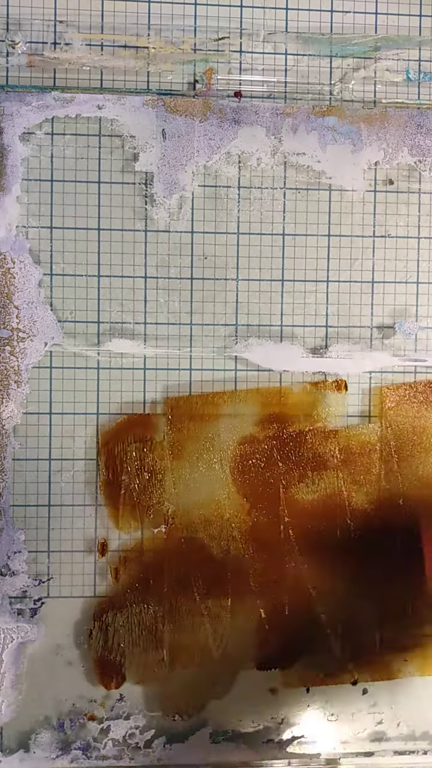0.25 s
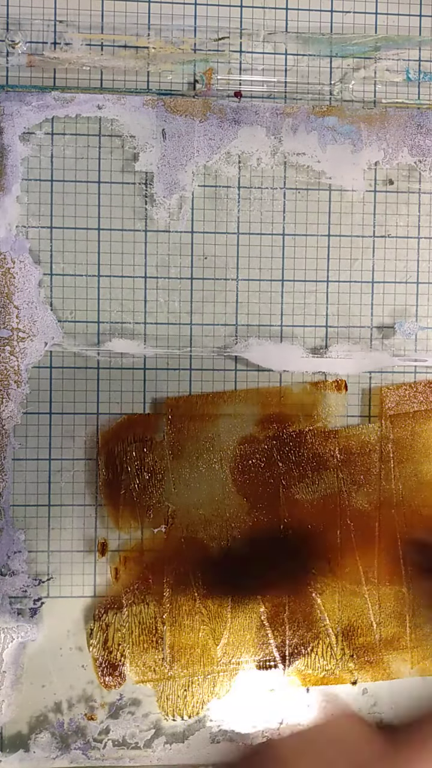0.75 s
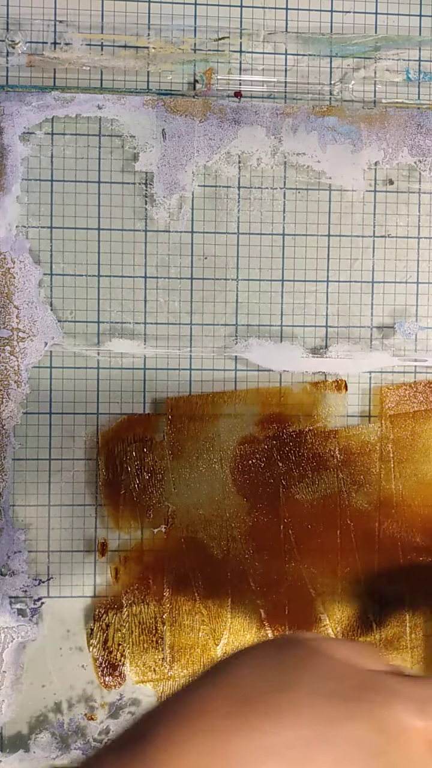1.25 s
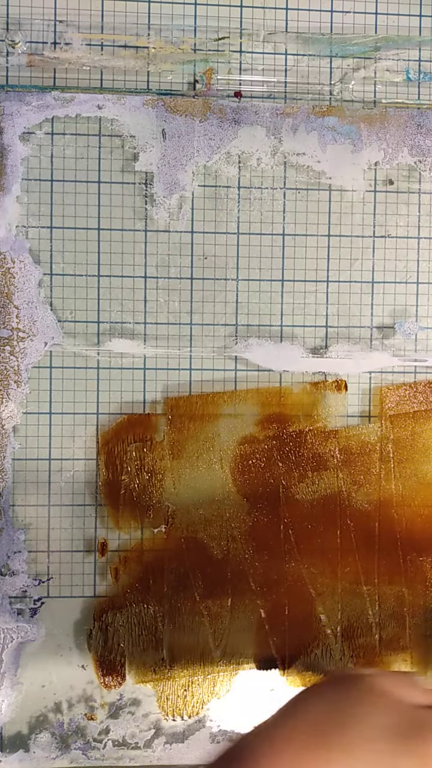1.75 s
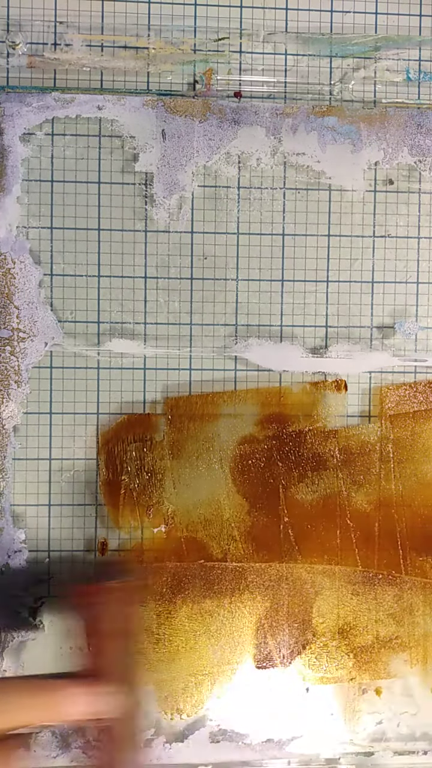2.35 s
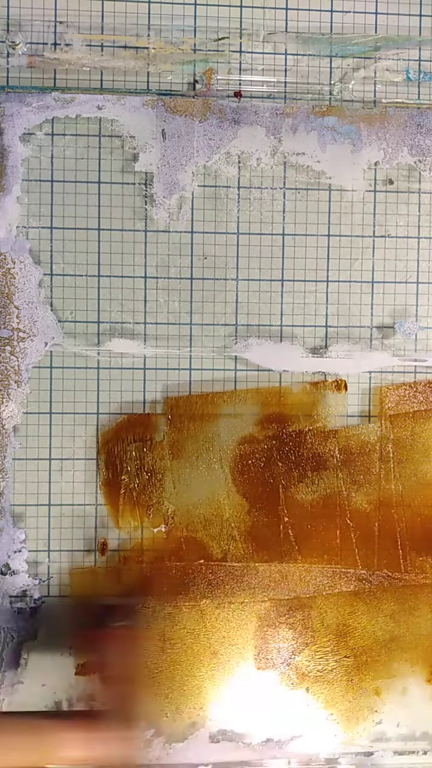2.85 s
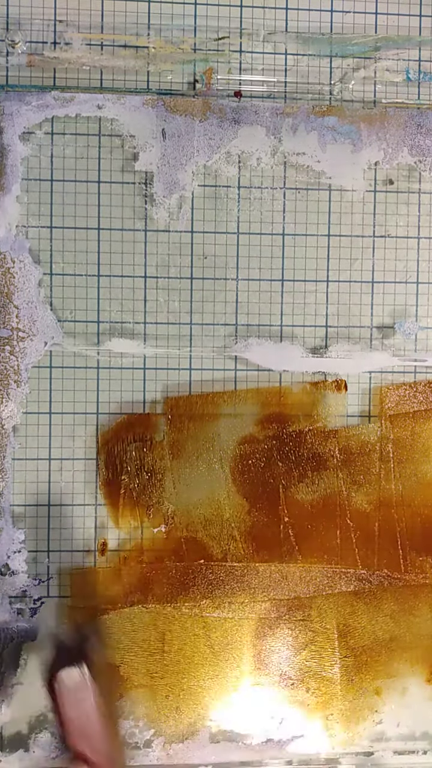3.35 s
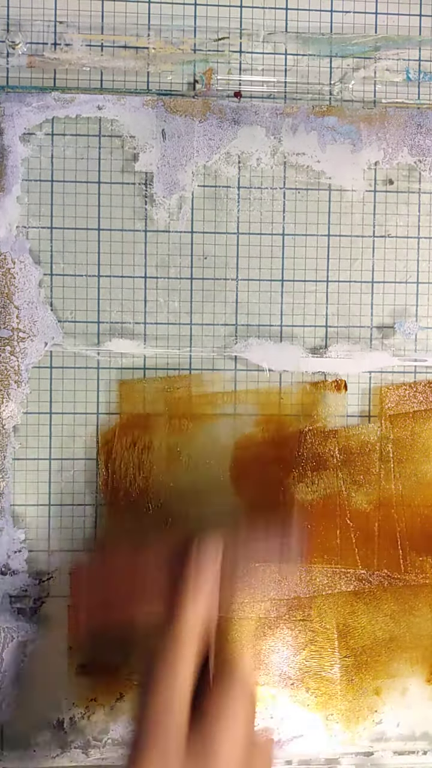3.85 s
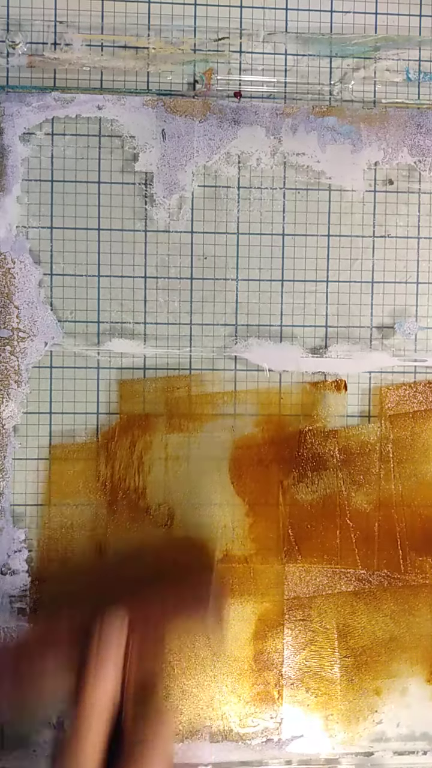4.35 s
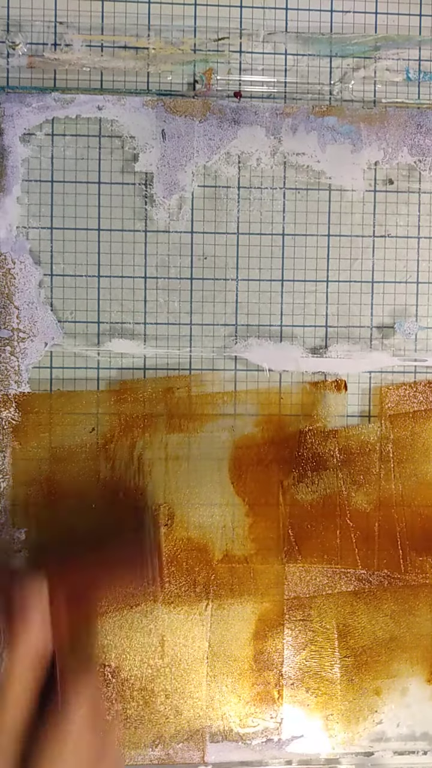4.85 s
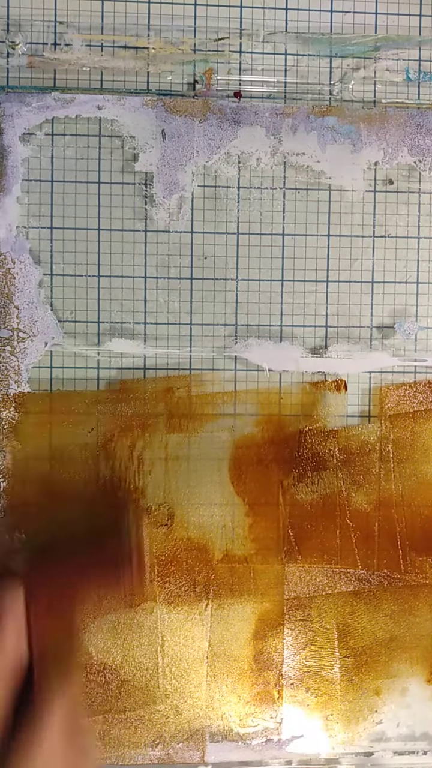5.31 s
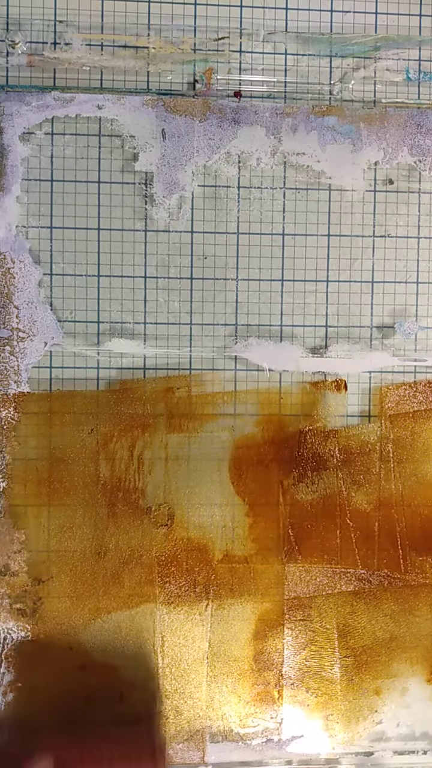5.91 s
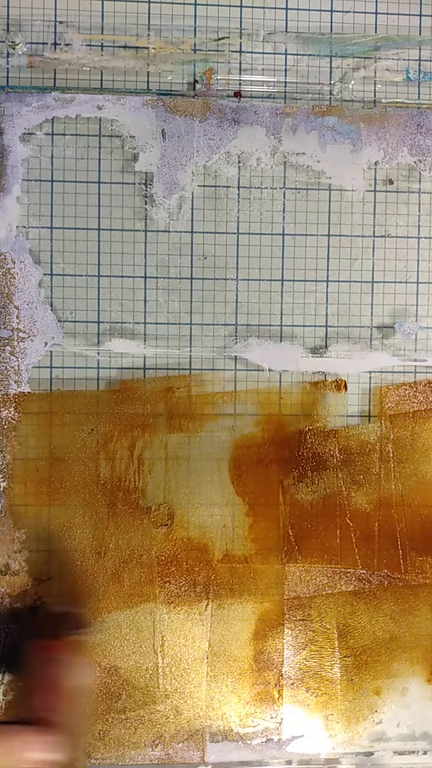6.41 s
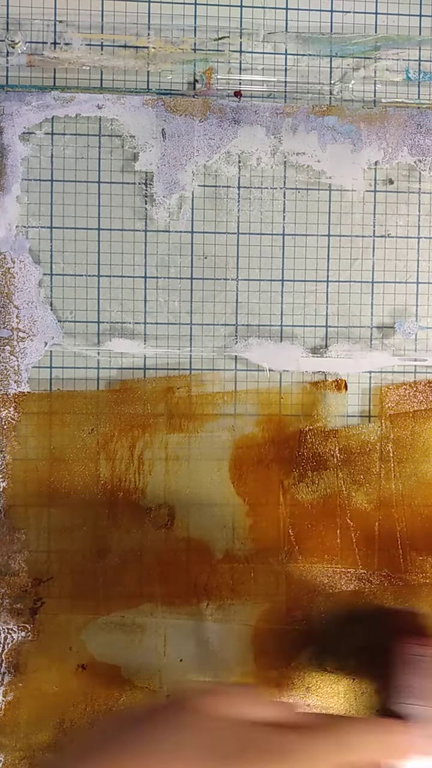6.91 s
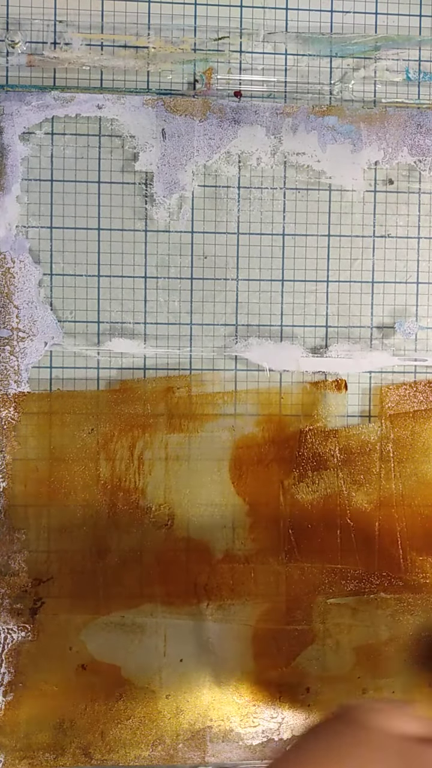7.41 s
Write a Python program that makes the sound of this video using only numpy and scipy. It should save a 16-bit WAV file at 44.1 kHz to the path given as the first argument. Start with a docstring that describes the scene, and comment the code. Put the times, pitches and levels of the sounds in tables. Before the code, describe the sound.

A rubber roller clacks its loose frame and rolls tacky paint across a plate, crackling in sizzling bursts with squelchy skids and low table thumps.

```python
"""A rubber brayer clacks: its loose axle cracks twice in a resonant plastic frame as it lands, lifts and turns.
It rolls tacky paint over a plate close to the microphone; breaking threads sizzle as trains of tiny random snaps.
The rubber skids in coarse and fine slips, rubs with a hollow sinking note and pings its frame when lifted.
Blows ring the modes of the craft table, and each push shakes it into a low rumble.
The roller moves between left and right in a small room with a diffuse tail and a quiet background."""
import sys
import numpy as np
from scipy import signal
from scipy.fft import rfft, irfft, next_fast_len
from scipy.io import wavfile
from scipy.ndimage import uniform_filter1d, map_coordinates

SR = 44100
rng = np.random.default_rng(int(sys.argv[2]) if len(sys.argv) > 2 else 0)


def waveform_to_disk(signal):
    """Save audio, clipped to [-1, 1], as 16-bit WAV at the path in sys.argv[1]."""
    frames = np.transpose(np.atleast_2d(signal))
    scaled = np.clip(frames, -1, 1) * 32767
    samples = np.round(scaled).astype(np.int16)
    wavfile.write(sys.argv[1], SR, samples)


N = 338247  # length in samples


def amp(db):
    """Level law: decibels to an amplitude ratio."""
    return 10 ** (np.asarray(db) / 20)


def unit(x):
    """Normalization: scales to an rms of 1."""
    return x / np.sqrt(np.mean(x ** 2) + 1e-20)


def peaked(x, size=176):
    """Short-time rms: scales the loudest few milliseconds of each channel to unit level."""
    return x / np.sqrt(uniform_filter1d(x ** 2, size).max(1, keepdims=True))


def read(points, hz):
    """Interpolation on a logarithmic frequency axis."""
    f, value = np.transpose(points)
    return np.interp(np.log(hz + 1), np.log(f + 1), value)


def smooth(x, first, second, axis=-1):
    """Smoothing by two moving averages in a row along one axis."""
    return uniform_filter1d(uniform_filter1d(x, first, axis=axis), second, axis=axis)


def add(mix, s, sound):
    """Superposition: adds a sound into the mix from time s."""
    start = max(round(s * SR), 0)
    part = mix[:, start:][:, :sound.shape[1]]
    part += sound[:, :part.shape[1]]


# likeness of the two ports: f/Hz, left-right correlation
PORT_LIKENESS = [(200, 0.66), (400, 0.89), (750, 0.63), (3000, 0.16), (9000, 0.087)]


def paired(z, hz):
    """Spatial coherence: two microphone ports hear similar bass but different treble."""
    same = np.clip(read(PORT_LIKENESS, hz), -1, 1)
    return np.array([z[0], same * z[0] + np.sqrt(1 - same ** 2) * z[1]])


def coloured(x, spectrum):
    """Linear filtering: gives a stereo excitation a spectrum, at unit level."""
    size = next_fast_len(N)
    hz = np.fft.rfftfreq(size, 1 / SR)
    filtered = paired(rfft(x, size), hz) * amp(read(spectrum, hz))
    return unit(irfft(filtered, size)[:, :N])


def causal(gain):
    """Minimum phase: the response with this gain that rings only after the blow."""
    log_gain = np.log(np.maximum(gain, 1e-5))
    both_sides = np.r_[log_gain, log_gain[-2:0:-1]]
    return np.exp(np.conj(signal.hilbert(both_sides)))[:len(gain)]


def snaps(per_s, spread_db):
    """Shot noise: tiny snaps at random times, of very unequal size, each a few samples long."""
    happens = rng.random(N) < per_s / SR
    sizes = amp(spread_db * np.minimum(rng.exponential(1, N), 5)) * happens
    power = signal.lfilter([1], [1, -np.exp(-1 / 14)], sizes ** 2)  # decays by 1/e in 14 samples
    return unit(np.sqrt(power) * rng.standard_normal((2, N)))


def patches(depth_db, size=400):
    """Amplitude modulation: a slow random gain makes the level uneven; size is in samples."""
    return amp(depth_db * unit(smooth(rng.standard_normal(N), size, size)))


def lumpy(x, depth_db, size, order=1024):
    """Time-frequency modulation: different bands swell from moment to moment, at unit level."""
    z = signal.stft(x, nperseg=order)[2]
    across_bands = uniform_filter1d(rng.standard_normal(z.shape[1:]), size, axis=0)
    lumps = unit(uniform_filter1d(across_bands, 4, axis=1))
    return unit(signal.istft(z * amp(depth_db * lumps), nperseg=order)[1][:, :N])


BELL = 1.92  # shape of a movement: 1 is pointed, 2 is rounded


def bell(t, peak_s, rise_s, fall_s):
    """Kinematics: a movement gathers speed, peaks at 1 and slows down; rise and fall are to 1/e."""
    distance = np.maximum((peak_s - t) / rise_s, (t - peak_s) / fall_s)
    return np.exp(-np.minimum(distance, 20) ** BELL)


def clicks(rows, colour, crack_s, scatter_db, tilt_db=0, scatter_s=0.013, size=2048):
    """Impulse response: single clicks, tilted per octave, each with a short scatter off the table top."""
    t, hz, out = np.arange(size) / SR, np.fft.rfftfreq(size, 1 / SR), np.zeros((2, N))
    shape = np.hypot(np.exp(-t / crack_s), amp(scatter_db) * np.exp(-t / scatter_s))
    body = causal(amp(read(colour, hz) + tilt_db * np.log2(hz + 1)))
    for s, db in rows:
        noise = rng.choice([-1., 1.], (2, size)) * shape
        click = irfft(paired(rfft(noise), hz) * body)
        add(out, s, peaked(click) * amp(db))
    return out


# background of the room: f/Hz, relative level/dB per Hz
AIR_SPECTRUM = [(20, -23.5), (120, 3.5), (240, -4.5), (450, -2), (1100, -6), (3000, -5), (4700, -21.5),
                (9800, -21.5), (16000, -28.5)]
AIR_DB = -87.5


def background():
    """Stationary noise: a steady random signal shaped by the room's background spectrum."""
    return amp(AIR_DB) * coloured(rng.standard_normal((2, N)), AIR_SPECTRUM)


# reverberation of the room: f/Hz, t60/s
ROOM_DECAY = [(150, 0.47), (1000, 0.37), (3000, 0.2), (9000, 0.18), (16000, 0.16)]


def room(x, wet_db=-13, build_s=0.0027):
    """Diffuse reverberation: a noise tail builds up quickly and dies band by band."""
    hz, t, z = signal.stft(rng.standard_normal((2, SR * 2 // 3)), SR, nperseg=256)
    decay = amp(-60 * t / read(ROOM_DECAY, hz)[:, None])
    z = paired(z, hz[:, None]) * decay * (1 - np.exp(-t / build_s))
    tail = signal.istft(z, SR, nperseg=256)[1]
    tail = tail / np.linalg.norm(tail[0])
    return amp(wet_db) * signal.fftconvolve(x, tail, axes=1)[:, :N]


# pushes of the roller: t/s of top speed, run-up/s, slow-down/s,
# relative level/dB of paint sizzle, relative level/dB of table rumble
PUSHES = [(.057, 0.3, 0.11, -57.5, -68.5), (.201, 0.029, 0.24, -55.5, -73.5), (0.402, 0.02, 0.06, -50, -93),
          (.639, 0.08, 0.073, -53, -72), (0.913, 0.068, 0.24, -58.5, -70),
          (1.325, 0.048, 0.079, -59, -67.5), (1.54, 0.026, 0.11, -53.5, -80),
          (1.989, 0.18, 0.051, -61.5, -69.5), (2.28, 0.015, 0.017, -50, -92),
          (2.47, 0.18, 0.078, -52, -74.5), (2.729, 0.071, 0.062, -49.5, -80.5),
          (2.991, 0.087, 0.06, -51, -68.5), (3.217, 0.069, 0.025, -36, -63.5),
          (3.335, 0.051, 0.14, -45, -73), (3.742, 0.027, 0.034, -44, -62), (3.961, 0.18, 0.2, -51.5, -77),
          (4.559, 0.14, 0.1, -49.5, -64.5), (5.014, 0.083, 0.13, -52, -67), (5.555, 0.2, 0.11, -52, -66.5),
          (6.005, 0.1, 0.13, -50.5, -68), (6.524, 0.13, 0.022, -51.5, -63), (6.681, 0.11, 0.15, -50.5, -68),
          (7.082, 0.3, 0.049, -62, -74.5), (7.311, 0.13, 0.16, -61.5, -72.5)]
RUMBLE_POWER = 0.13  # the rumble grows as this power of the speed


def strokes(size=4000):
    """Speed-driven excitation: each push sets the gains of sizzle and rumble, which add as powers."""
    t, power = np.linspace(0, N / SR, size), np.zeros((2, size))
    for peak_s, rise_s, fall_s, sizzle_db, rumble_db in PUSHES:
        speed = bell(t, peak_s, rise_s, fall_s)
        gains = np.array([amp(sizzle_db) * speed, amp(rumble_db) * speed ** RUMBLE_POWER])
        power += gains ** 2
    return [np.interp(np.arange(N) / SR, t, np.sqrt(p)) for p in power]


# shaken table: f/Hz, relative level/dB per Hz
RUMBLE_SPECTRUM = [(18, -27), (45, -15), (62, 5.5), (95, -7.5), (118, 8.5), (142, -9.5), (170, 2),
                   (230, -25.5), (350, -10), (700, -47.5)]


def rumble(rumbling, gain_db=-1):
    """Forced vibration: the uneven roller shakes the table as low random noise."""
    shaking = coloured(rng.standard_normal((2, N)), RUMBLE_SPECTRUM)
    return lumpy(shaking, depth_db=5.5, size=2) * amp(gain_db) * rumbling


# the roller meets the plate: t/s, relative level/dB, centre of the blow f/Hz
PLATE_BLOWS = [(3.692, -35.5, 850), (0.907, -42, 146), (1.062, -36, 78), (1.437, -42, 94.5),
               (1.71, -47, 356), (3.688, -23.5, 378), (3.693, -26, 194), (3.883, -29.5, 100),
               (4.393, -38, 103), (6.443, -42.5, 74.5), (6.445, -41, 294), (6.926, -44.5, 270),
               (7.573, -35.5, 352), (7.66, -37.5, 490)]
# modes of table and plate: f/Hz, relative level/dB, t60/s
TABLE_MODES = [(60, -5, .25), (84, -9, .2), (119, -1, .26), (165, -1, .16), (206, -1, .18), (293, -4, .12),
               (331, -3, .11), (409, -3, .1), (446, -5, .1), (653, -5, .1)]


def thuds(octaves=0.46, rise_s=0.0034, gain_db=-6, puff_db=-9, puff_s=0.028):
    """Modal excitation: the blow's spectrum weights the table's modes; the rubber adds a dull puff."""
    t, out = np.arange(SR // 3) / SR, np.zeros((2, N))
    hz = np.fft.rfftfreq(len(t), 1 / SR) + 1
    for s, db, centre_hz in PLATE_BLOWS:
        blow = np.exp(-.5 * (np.log2(hz / centre_hz) / octaves) ** 2)
        ring = np.zeros(len(t))
        for f, mode_db, t60 in TABLE_MODES:
            decay = amp(mode_db - 60 * t / t60)
            ring += decay * np.interp(f, hz, blow) * np.sin(2 * np.pi * f * t + rng.random())
        noise = paired(rfft(rng.standard_normal((2, len(t)))), hz)
        puff = unit(irfft(noise * blow)) * np.exp(-t / puff_s)
        onset = 1 - np.exp(-t / rise_s)
        add(out, s, (ring + amp(puff_db) * puff) * onset * amp(db + gain_db))
    return out


# the turning roller rubs: t/s of the middle, half length/s, relative level/dB, pitch in the middle f/Hz
HOLLOW_RUBS = [(0.04, 0.086, -64.5, 510), (0.231, .05, -60, 447), (0.681, 0.1, -67, 433),
               (2.288, 0.03, -65.5, 457), (2.966, 0.07, -69, 442), (4.156, 0.04, -65, 360),
               (0.393, 0.089, -68, 430), (5.467, 0.035, -70, 814), (5.491, 0.073, -73.5, 440),
               (5.529, 0.058, -57.5, 114), (6.95, 0.052, -64.5, 364)]
RUB_SAG_OCTAVES = 0.077  # the note sinks this far in half a rub


def rubs(width=0.31):
    """Resonance: uneven slips stir one hollow resonance, whose note sinks as the roller slows."""
    out, uneven = np.zeros((2, N)), patches(depth_db=3.0, size=700)
    for s, half_s, db, hz in HOLLOW_RUBS:
        t = np.arange(max(-2 * half_s, -s), 2 * half_s, 1 / SR)
        pitch_hz = hz * 2 ** (-RUB_SAG_OCTAVES * t / half_s)
        turn = np.exp(2j * np.pi * np.cumsum(pitch_hz) / SR)
        r = np.exp(-np.pi * width * hz / SR)  # pole radius; width is relative to the pitch
        slips = paired(rng.standard_normal((2, len(t))), hz)
        # a double pole at zero frequency, carried up to the moving pitch
        note = (turn * signal.lfilter([1], np.poly([r, r]), slips / turn)).real
        add(out, s + t[0], unit(note) * bell(t, 0, half_s, half_s) * amp(db))
    return out * unit(uneven)


# the rubber drags instead of rolling: t/s of the hardest drag, rise/s, fall/s, relative level/dB
DRAGS = [(0.203, 0.011, 0.054, -51), (.412, 0.016, 0.046, -63.5), (4.375, 0.013, 0.018, -60),
         (1.293, 0.0027, 0.017, -48), (3.155, 0.01, 0.01, -46.5), (3.21, 0.034, 0.033, -46),
         (3.363, 0.041, 0.02, -49), (3.746, 0.026, 0.052, -46.5), (5.624, 0.0073, 0.034, -60.5),
         (6.666, 0.004, 0.035, -41.5), (6.78, 0.1, 0.073, -59.5), (6.92, 0.023, 0.019, -56),
         (7.381, 0.0075, 0.014, -58.5), (7.577, 0.011, 0.12, -54.5)]
# dragging rubber: f/Hz, relative level/dB per Hz
DRAG_SPECTRUM = [(150, -43.5), (400, -4.5), (700, 1), (1100, -4), (2200, -3.5), (3200, -6.5), (6000, -11),
                 (9000, -4.5), (12500, -10), (16000, -20)]


def skids(gain_db=3, size=4000):
    """Stick-slip friction: rubber on the wet plate squelches in coarse jerks over fine slips."""
    jerky = snaps(per_s=10000, spread_db=2.0) + snaps(per_s=260, spread_db=3.0)
    slips = lumpy(coloured(jerky, DRAG_SPECTRUM), depth_db=4.5, size=5)
    t, power = np.linspace(0, N / SR, size), np.zeros(size)
    for peak_s, rise_s, fall_s, db in DRAGS:
        power += (amp(db) * bell(t, peak_s, rise_s, fall_s)) ** 2
    return slips * np.interp(np.arange(N) / SR, t, np.sqrt(power)) * amp(gain_db)


# breaking paint threads: f/Hz, relative level/dB per Hz
THREAD_SPECTRUM = [(400, -19), (900, -26.5), (1900, -23.5), (2300, -11.5), (2750, -13), (3150, -4.5),
                   (3700, -10), (4700, -12), (7000, -9.5), (9600, 0), (11000, -3), (13000, -9),
                   (16000, -14.5)]


def paint(sizzling, ticks_db=-12, bright_db=-35):
    """Rupture noise: threads of paint snap behind the roller, and the hardest pushes fizz brighter."""
    fine = snaps(per_s=5400, spread_db=3.5) * patches(depth_db=1.5)  # thick and thin places in the paint
    threads = fine + amp(ticks_db) * snaps(per_s=330, spread_db=2.0)  # a thick one now and then
    sizzle = lumpy(coloured(threads, THREAD_SPECTRUM), depth_db=2.5, size=24, order=512)
    # the second difference tilts the sizzle towards the treble
    fizz = -unit(np.diff(sizzle, n=2, prepend=0, append=0)) - sizzle
    brightness = np.minimum(sizzling / amp(bright_db), 2)
    return (sizzle + brightness * fizz) * sizzling


# thick strands of paint let go: t/s, level/dB
STRAND_TICKS = [(.7548, -45), (.775, -37), (.7869, -32.5), (1.3206, -37), (1.3643, -42), (2.4735, -40.5),
                (2.4915, -47), (2.9876, -41.5), (3.1164, -41), (3.1316, -31), (3.1715, -51), (3.2115, -41),
                (3.4336, -41), (3.4842, -29), (4.115, -40), (5.1385, -38), (6.888, -43), (6.908, -44)]


def ticks():
    """Sudden release: a thick strand of paint lets go with a bright tick."""
    return clicks(STRAND_TICKS, THREAD_SPECTRUM, crack_s=0.0028, scatter_db=-8, tilt_db=1.0)


# the lifted roller jiggles: t/s, level/dB
FRAME_PINGS = [(.8672, -41), (.9625, -37.5), (.979, -38), (1.0065, -36.5), (1.029, -53), (1.0365, -33.5),
               (1.048, -42), (2.196, -42), (5.2623, -45), (5.2918, -31.5), (5.296, -28)]
# a light ping: f/Hz, relative level/dB per Hz
PING_SPECTRUM = [(1500, -32), (3200, 4), (4000, -10), (5500, -21.5), (14000, -26)]


def pings():
    """Light impact: the lifted roller jiggles and pings its frame."""
    return clicks(FRAME_PINGS, PING_SPECTRUM, crack_s=.001, scatter_db=-18)


# the axle knocks in its frame, one end after the other: t/s, level/dB, hollow body level/dB,
# frame ring level/dB, sharp edge level/dB, ring f/Hz, second strike level/dB relative to the first
AXLE_KNOCKS = [(0.194, -34, 2, -8, -1, 3420, -17), (0.6014, -24, 4.5, -6, 1, 3600, -13),
               (0.6716, -38.5, 6, -4.5, 8, 3230, -7), (1.059, -22.5, 4.5, -2.5, -8, 3060, 1.5),
               (1.331, -34.5, 9, -9.5, -12, 2780, -9), (1.4328, -24.5, 10.5, -2.5, -4, 3700, -26),
               (1.5383, -27.5, 12, 5, 18, 2700, -3.5), (1.675, -36, 5.5, -6, 2, 4690, -24),
               (1.7103, -30, 4.5, -10, 11.5, 3130, -30), (1.8553, -32.5, 14, -1.5, 13.5, 2870, -12),
               (2.144, -34, 11, -1, 0.5, 2800, -21), (3.8784, -20.5, 4.5, -7.5, -1, 3220, 0.5),
               (4.134, -41.5, 4.5, -7.5, 10, 3150, -6.5), (4.3939, -25.5, 10.5, -2.5, -10, 3240, 1.5),
               (4.868, -23, 6.5, -8, -3.5, 3160, 7.5), (5.296, -34.5, 6.5, 4, -9, 3050, 0.5),
               (5.8421, -28, 8.5, -0.5, 1.5, 3700, -7.5), (6.0644, -37, 0.5, -6.5, 4, 3600, -6.5),
               (6.1544, -26, -1, -1.5, 0, 3700, 10), (6.2312, -29.5, 3, 2.5, -1, 4860, -7.5),
               (6.4379, -24, 9.5, -2, -5, 3000, 1.5), (7.5698, -38.5, 3.5, -11, 9.5, 3080, -15),
               (7.654, -31, 19.5, 3.5, -3, 2930, 3)]
# resonances of the plastic frame: f/Hz, width/Hz, level/dB over the broad clack
FRAME_MODES = [(642, 37, 8), (1090, 270, 5), (1460, 70, 3), (2254, 180, 7.5), (3070, 290, 15.5),
               (3870, 330, 11.5), (5850, 180, 6), (7070, 190, 9.5), (8930, 1900, 8.5)]
# broad clack: f/Hz, relative level/dB per Hz
CLACK_SPECTRUM = [(100, -37), (400, -10.5), (870, -15.5), (1800, -5.5), (2700, -0.5), (4800, 0),
                  (6500, -1.5), (8500, 0), (10500, 4.5), (12500, -3), (16000, -11)]
REBOUND_S = 0.0042  # between the two ends of the axle
RING_WIDTH_HZ, RING_DB = 540, 15  # the resonance that the point of contact favours


def clacks(crack_s=0.0025, scatter_s=0.014, scatter_db=-11.5, scuff_db=-22, scuff_s=0.0017,
           ripple_db=3, size=4096, lead=300):
    """Source-filter impact: the axle scuffs, cracks at one end then the other, and the table top scatters it."""
    t, hz, out = (np.arange(size) - lead) / SR, np.fft.rfftfreq(size, 1 / SR), np.zeros((2, N))
    scuff = amp(scuff_db) * np.exp(-abs(t) / scuff_s)
    crack = np.where(t < 0, scuff, np.exp(-abs(t) / crack_s))
    scatter = amp(scatter_db) * np.exp(-abs(t) / scatter_s) * (t > 0)
    for s, db, body_db, frame_db, edge_db, ring_hz, second_db in AXLE_KNOCKS:
        resonance = np.ones(len(hz))
        for f, width_hz, peak_db in [*FRAME_MODES, (ring_hz, RING_WIDTH_HZ, RING_DB)]:
            resonance += (amp(peak_db) - 1) / (1 + (2 * (hz - f) / width_hz) ** 2)
        tone = [(1600, body_db), (2700, frame_db), (3800, frame_db), (5000, 0), (10500, 0), (12600, edge_db)]
        frame = amp(read(CLACK_SPECTRUM, hz)) * resonance * amp(read(tone, hz))
        # each point of contact favours other resonances
        contact_db = ripple_db * unit(smooth(rng.standard_normal(len(hz)), 36, 20))
        shapes = []
        for first in (crack, scatter):
            second = amp(second_db) * np.interp(t - REBOUND_S, t, first)
            shapes.append(np.hypot(first, second))
        noise = rng.choice([-1., 1.], (2, 2, size)) * np.array(shapes)[:, None]
        direct, scattered = rfft(noise)
        blow = paired(direct * causal(amp(contact_db)) + scattered, hz)
        add(out, s + t[0], peaked(irfft(blow * causal(frame))) * amp(db))
    return out


# where the roller is: t/s, position from -1 left to 1 right
ROLLER_PLACE = [(.2, 0.34), (.6, -0.15), (1.1, 0.61), (3.4, 1), (3.85, 0.11), (4.9, 0.26), (5.3, -0.38),
                (5.85, -0.034), (6.2, 1), (7.3, 0.73), (7.67, 0.14)]
SHADE_DB, LAG_S = 3, 0.00021  # at far right, the left port hears it this much weaker and later than the right


def placed(x):
    """Interaural-style cues: the roller's position shades and delays the sound at the farther port."""
    n = np.arange(N)
    position = np.interp(n / SR, *np.transpose(ROLLER_PLACE))
    ports = []
    for port, side in zip(x, (position / 2, -position / 2)):
        delayed = map_coordinates(port, [n - side * LAG_S * SR], order=5)
        ports.append(delayed * amp(-side * SHADE_DB))
    return np.array(ports)


def scene():
    """Superposition: the brayer moves from side to side over the plate, in a quiet room."""
    sizzling, rumbling = strokes()
    contact = thuds() + skids() + rubs() + rumble(rumbling)
    brayer = placed(clacks() + pings() + ticks() + paint(sizzling) + contact)
    return brayer + room(brayer) + background()


EDGE_HZ = 16100


def record(dry):
    """Band limiting: a linear-phase low-pass removes the highest treble."""
    low_pass = signal.firwin(301, EDGE_HZ, window=("kaiser", 9), fs=SR)
    return signal.oaconvolve(dry, low_pass[None], "same")


dry = scene()
out = record(dry)
waveform_to_disk(out)
```